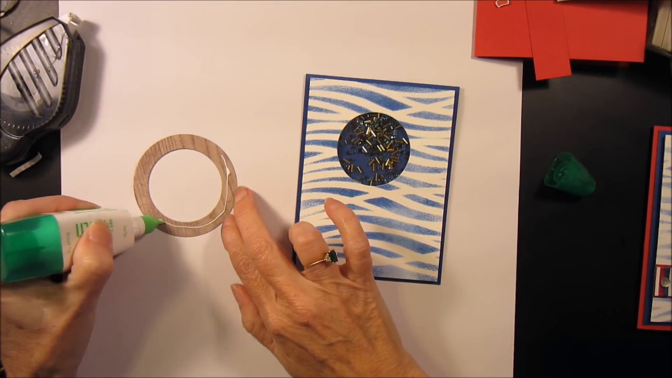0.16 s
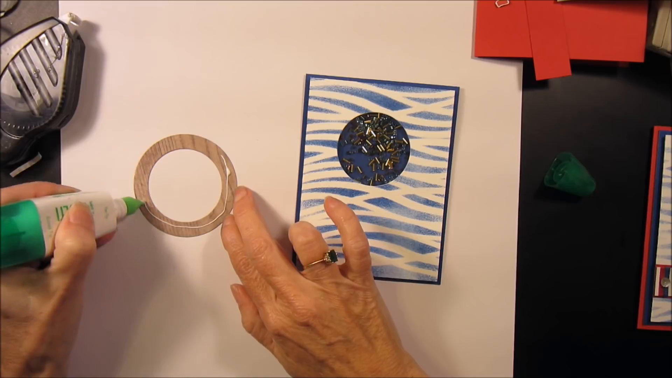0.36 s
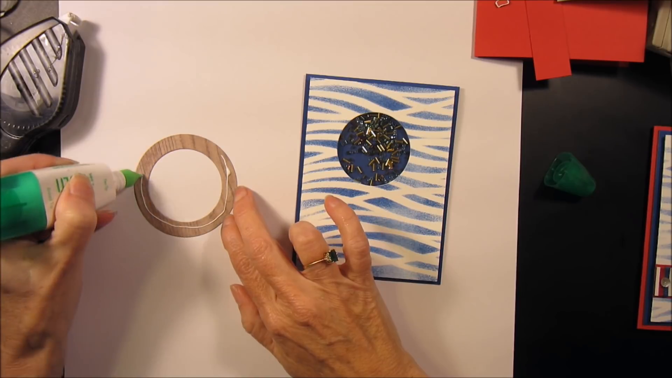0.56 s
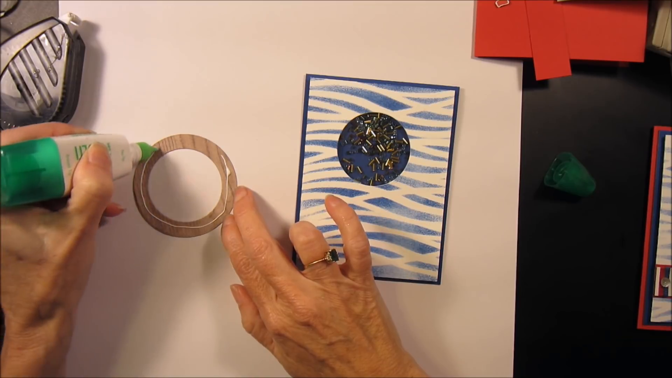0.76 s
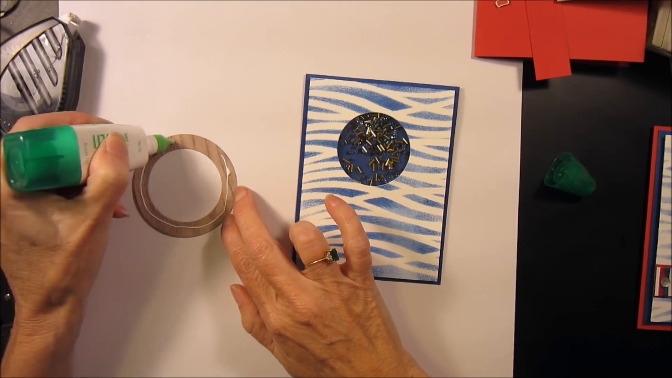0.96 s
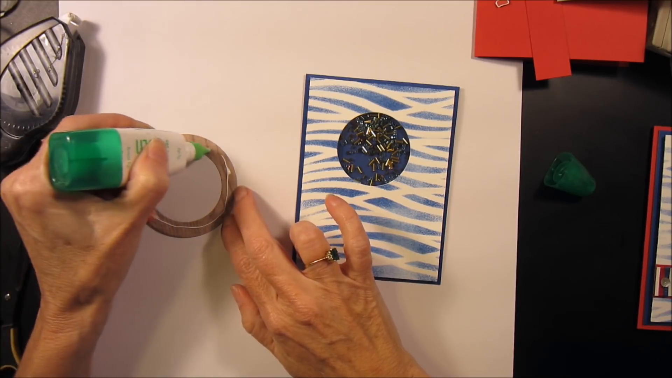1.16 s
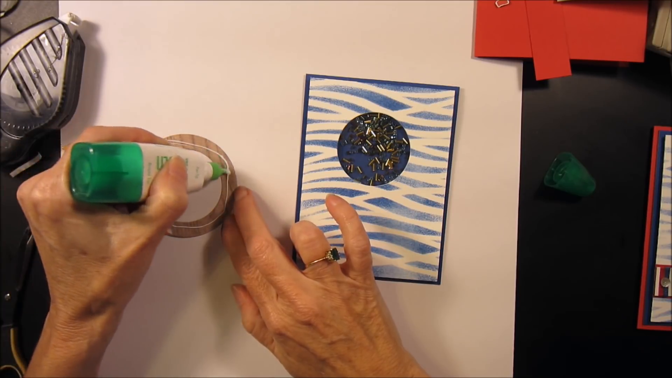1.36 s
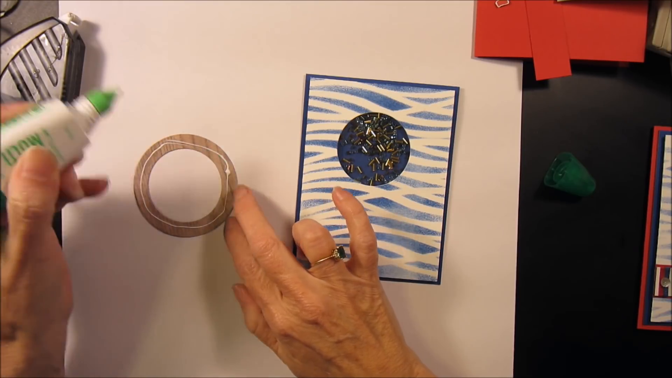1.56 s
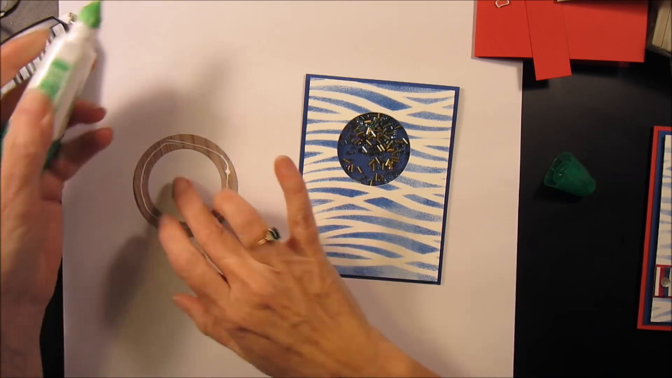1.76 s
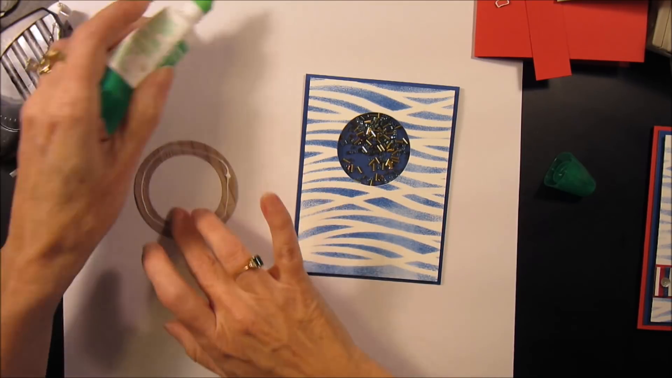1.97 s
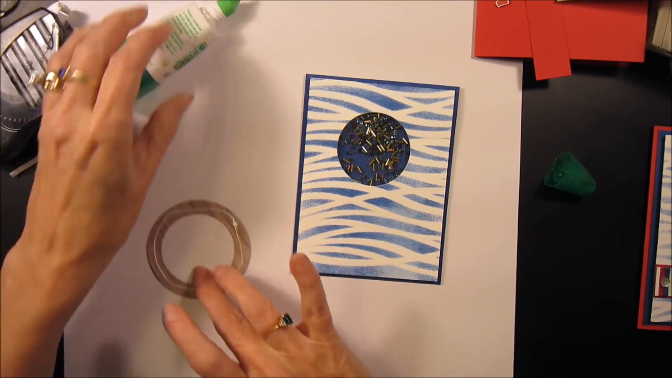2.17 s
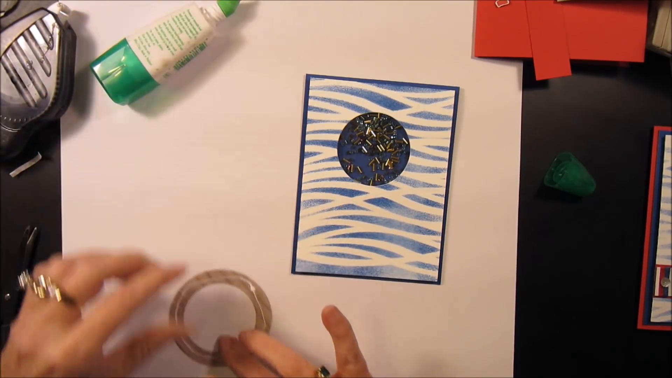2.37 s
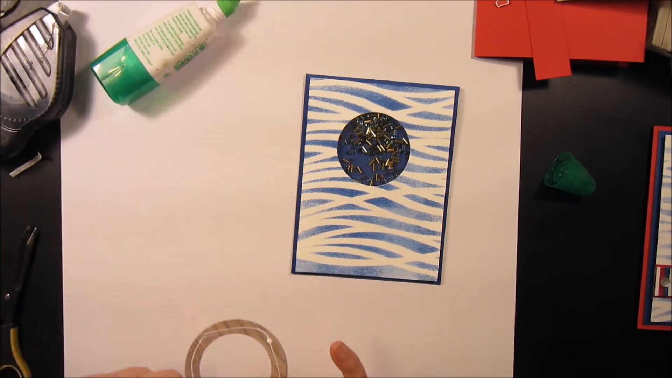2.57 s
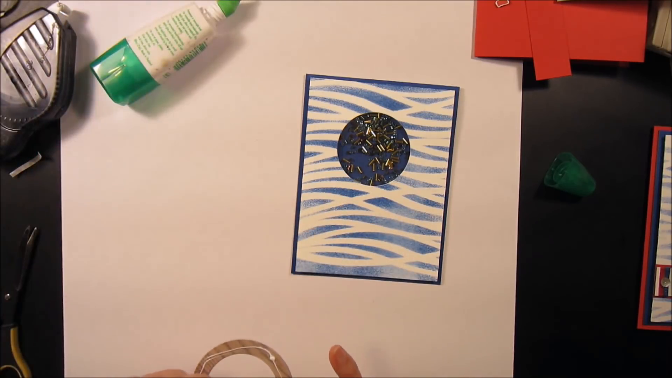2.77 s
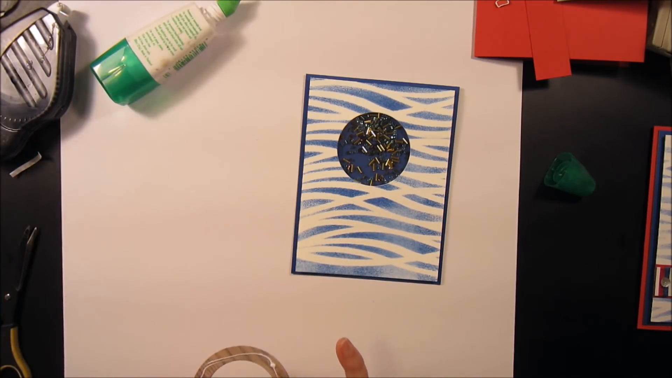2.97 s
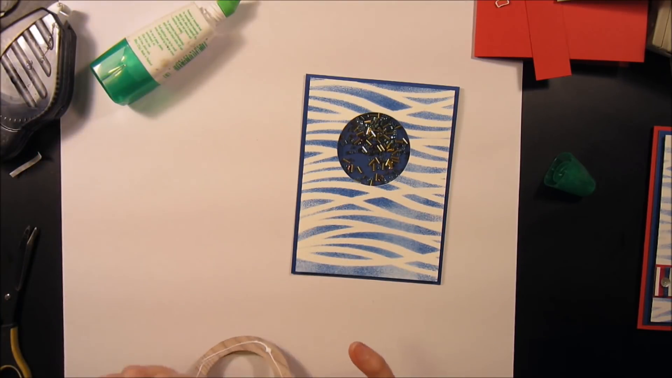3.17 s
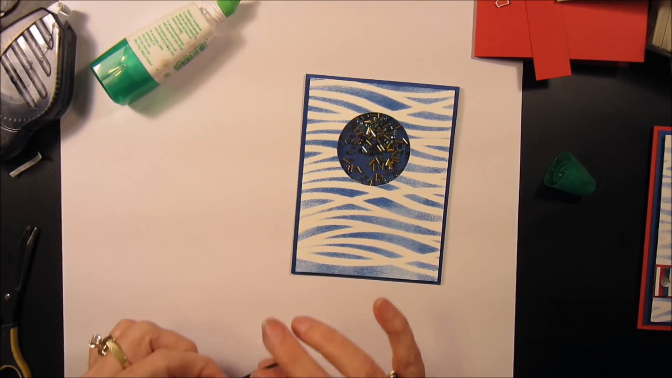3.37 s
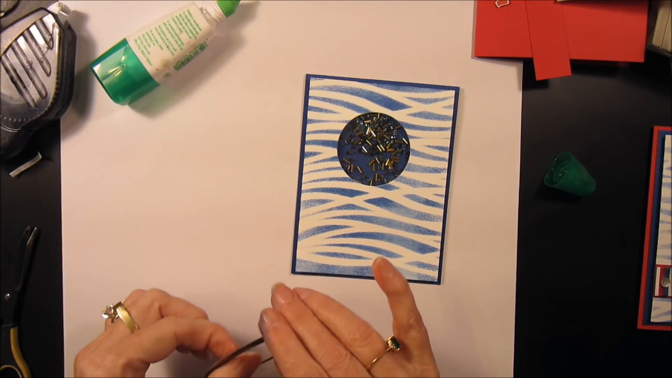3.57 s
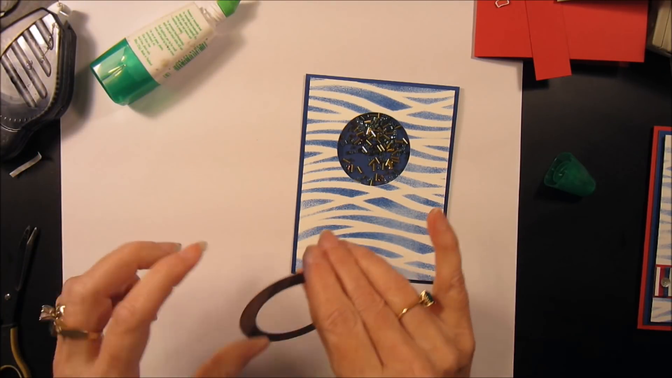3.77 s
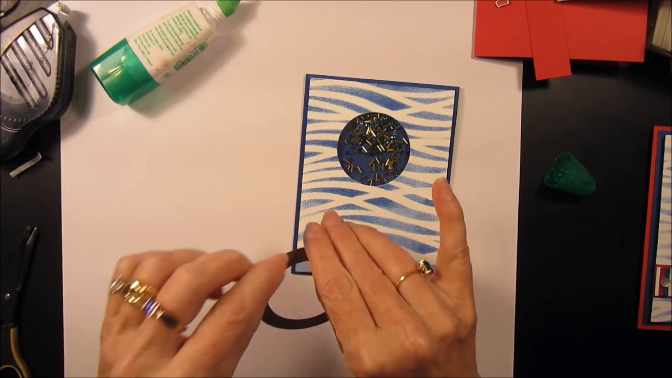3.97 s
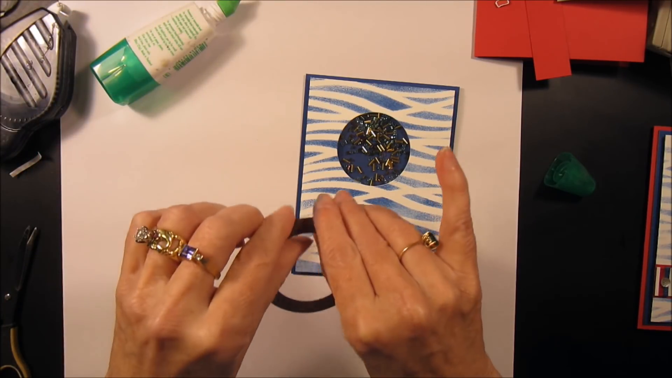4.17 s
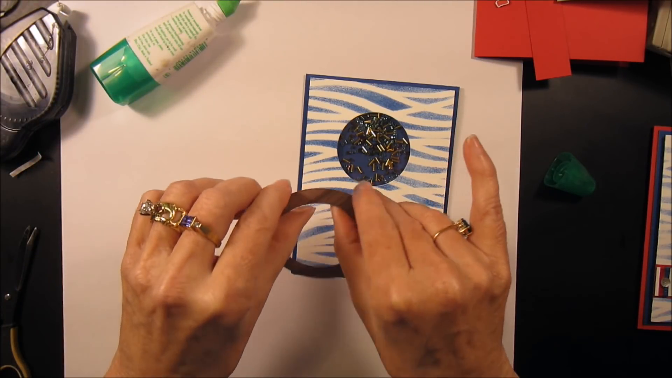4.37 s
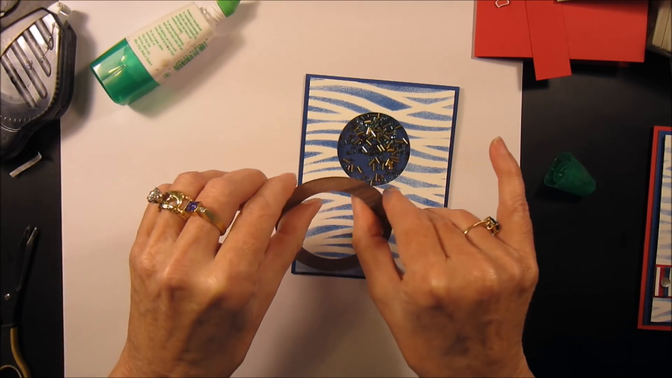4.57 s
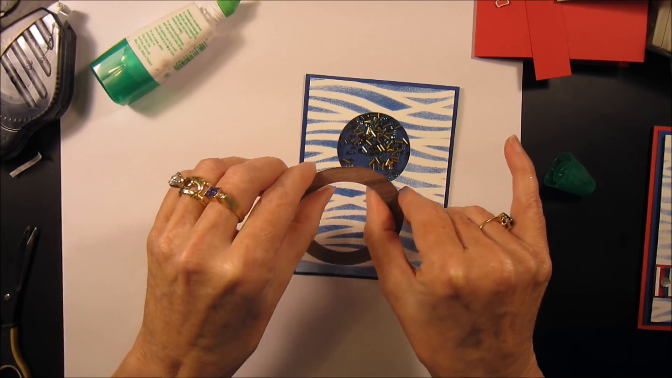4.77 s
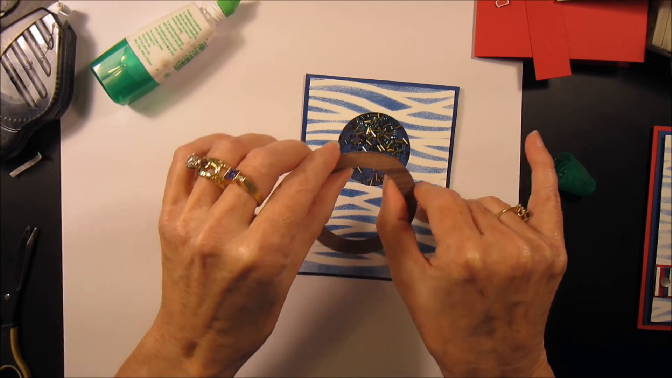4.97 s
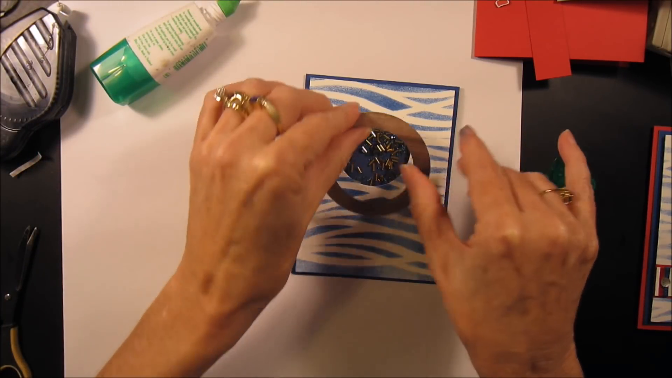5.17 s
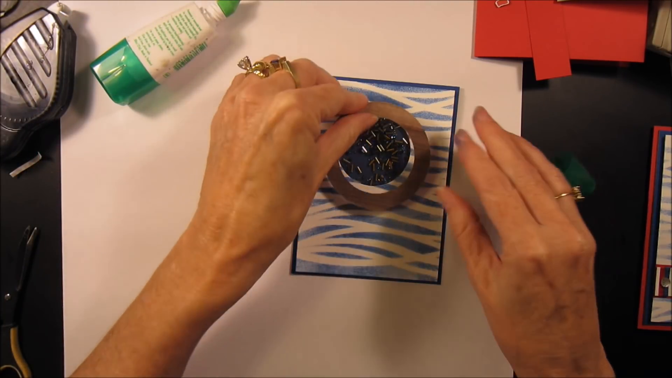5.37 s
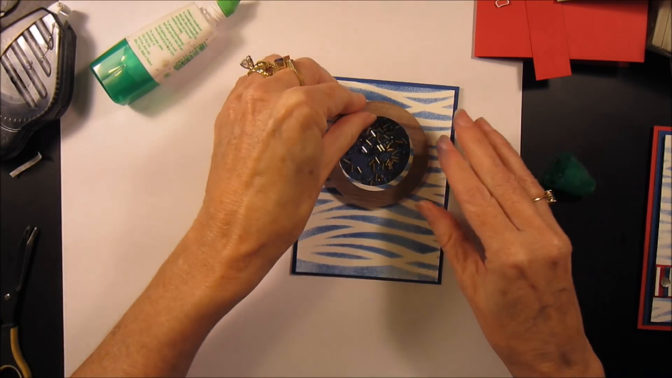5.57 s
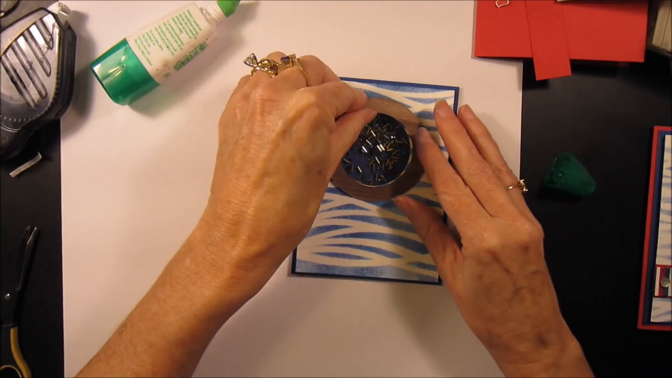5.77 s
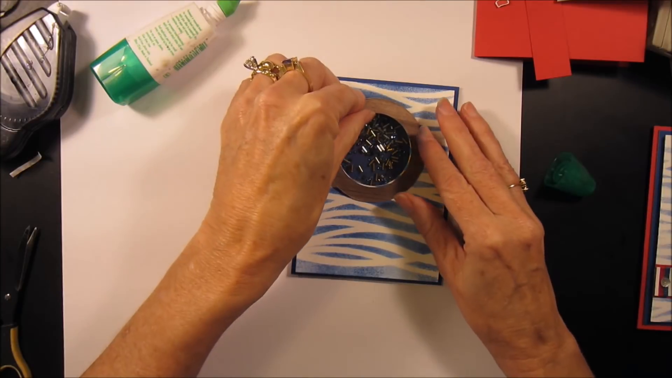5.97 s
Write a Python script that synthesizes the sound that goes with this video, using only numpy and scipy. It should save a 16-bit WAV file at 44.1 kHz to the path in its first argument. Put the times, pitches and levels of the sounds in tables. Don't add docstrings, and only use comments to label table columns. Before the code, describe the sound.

Faint glue snaps, two sharp knocks of a plastic bottle on a work table, then light paper scuffing and sparse ticks over soft hiss.

```python
import sys
import numpy as np
from scipy import signal
from scipy.fft import rfft, irfft
from scipy.io import wavfile
from scipy.ndimage import uniform_filter1d

SR = 44100
rng = np.random.default_rng(int(sys.argv[2]) if len(sys.argv) > 2 else 0)


def gain_from_db(level_db):
    decades = np.asarray(level_db, float) / 20
    return 10 ** decades


def dump_mix(stems):
    frames = np.atleast_2d(stems).T
    limited = np.clip(frames, -1, 1)
    pcm = np.round(limited * 32767).astype(np.int16)
    wavfile.write(sys.argv[1], SR, pcm)


N = 266099

# pitch_hz, level_db (per Hz)
AIR_COLOUR = [(12, -69), (20, 0), (70, 1.5), (107, 1), (150, 1.5), (328, -4), (485, -6), (542, -8),
              (1220, -11), (6360, -19), (7950, -20), (8650, -19.5), (12800, -26.5), (16000, -31.5)]
AIR_DB = -59.5
# time_s, level_db
AIR_SWELL = [(0, 2), (.15, -0.5), (1, 0), (1.5, -0.5), (3.5, -1), (4.8, 0), (6.03, -2)]
# pitch_hz, level_db (rms)
LAMP_WHINE = [(59.2, -102), (7730, -84), (7790, -81.5), (7854, -73.5), (7881, -85.5), (13308, -108)]
# pitch_hz, t60_s (time to fall by 60 dB)
ROOM_DECAY = [(100, 0.54), (400, 0.28), (800, 0.46), (1500, 0.36), (2500, 0.39), (4000, 0.25), (7000, 0.27),
              (12000, 0.14)]
ROOM_DB = -10.5

# pitch_hz, level_db (per Hz)
PAPER_HISS = [(2350, -46), (4000, -2.5), (4680, -3), (5040, -3.5), (7620, -1.5), (9380, -3), (13400, -3),
              (16000, -16)]
# pitch_hz, level_db (per Hz)
PAPER_DRAG = [(350, -6), (700, 1.5), (1300, 0), (2100, 4.5), (2700, -1), (3300, 3), (4500, -1), (6000, -3),
              (9000, -32)]
# peak_s, swell_s, fade_s, hiss_db, drag_db
PUSHES = [(.02, .1, 0.45, -66, -74), (1.673, .03, 0.04, -58, -62), (1.703, 0.027, .025, -61, -62),
          (1.765, .008, .07, -65, -68), (1.81, 0.073, .012, -78, -68), (1.985, .03, 0.18, -68, -90),
          (2.012, .004, 0.07, -53, -80), (2.11, 0.27, 0.0087, -54, -88), (2.152, .008, .06, -57, -80),
          (2.21, .04, 0.35, -57.5, -65), (2.334, 0.28, 0.4, -52, -79), (2.461, 0.069, 0.048, -52, -65),
          (2.558, 0.19, .12, -55.5, -59), (2.62, 0.065, .008, -60, -56.5),
          (2.692, 0.0094, 0.021, -57, -53.5), (2.73, .008, 0.1, -64, -63.5), (2.942, .008, 0.17, -66, -73),
          (2.977, .008, 0.04, -56.5, -78), (3.165, 0.1, .03, -62.5, -77), (3.23, .025, 0.093, -58, -66),
          (3.286, 0.087, 0.024, -65, -61), (3.361, .005, .01, -71, -80), (3.4, 0.058, .025, -64, -76),
          (3.688, .02, .018, -61, -90)]
# start_s, length_s, edge_hz, edge_db, drag_db
SCUFFS = [(1.733, 0.025, 9400, -58, -65), (2.52, .085, 1990, -60.5, -80), (2.514, .09, 3260, -59.5, -80),
          (2.52, 0.066, 7700, -56, -77), (2.616, 0.034, 10500, -60, -62),
          (2.634, 0.033, 9670, -50.5, -53.5), (2.653, 0.046, 10500, -56, -56.5),
          (2.869, 0.036, 10700, -59.5, -67), (2.893, 0.041, 10600, -51.5, -82),
          (2.926, 0.013, 9100, -50.5, -54), (3.321, 0.04, 10900, -46, -79),
          (3.323, 0.036, 5050, -46.5, -85), (3.331, 0.027, 2860, -51, -73),
          (5.112, 0.017, 9200, -47.5, -59), (5.119, 0.015, 5000, -54.5, -64),
          (5.122, 0.013, 2060, -54.5, -54), (5.125, 0.0097, 1030, -55, -72),
          (5.113, 0.018, 12800, -56, -60), (5.5878, 0.0076, 3470, -49.5, -75),
          (5.591, 0.0047, 6540, -51, -70), (5.592, 0.0037, 10200, -57, -67)]
# start_s, peak_db, pitch_hz
GLUE_TICKS = [(1.5738, -46, 10500), (1.5797, -32, 10700), (1.5925, -27, 9900), (1.606, -29, 10700),
              (1.6113, -28, 11100), (1.62, -46, 13100), (1.6402, -28, 10900), (1.6412, -27.5, 10900),
              (1.667, -42, 14500), (1.677, -29, 9500), (2.1236, -16.5, 7100), (2.6377, -26, 5000),
              (2.6455, -36, 11200), (2.655, -48, 4000), (2.67, -41, 4500), (2.677, -37, 3500),
              (2.688, -37, 4000), (2.7297, -37, 12000), (2.897, -32, 11500), (2.952, -33, 6000),
              (2.9617, -40, 14000), (2.9759, -31, 10100), (3.3946, -44, 3000), (5.5672, -46, 13000)]
# start_s, peak_db, pitch_hz, t60_s
NAIL_TAPS = [(1.623, -41, 3130, .0023), (1.6757, -43, 3500, 0.0016), (2.461, -36.5, 3460, 0.0027),
             (2.928, -43, 4100, 0.012), (4.1769, -46, 1230, 0.011), (4.176, -42.5, 2570, .004),
             (5.5874, -32.5, 3230, 0.0045), (5.5885, -39, 6460, .0024)]

# pitch_hz, peak_db, t60_s
SHELL = [(262, -29.5, 0.023), (650, -21.5, 0.016), (1000, -37, 0.14), (1180, -12, 0.0093),
         (1230, -40, 0.035), (1400, -26, 0.027), (1530, -23, 0.0073), (1760, -43, 0.037),
         (2170, -18, 0.0082), (4100, -27, 0.017), (4540, -29, 0.014), (5430, -23, 0.011),
         (7170, -34, 0.013), (8800, -32, 0.005)]
# pitch_hz, peak_db, t60_s
CAP = [(626, -19.5, 0.01), (970, -46, 0.048), (1270, -17, 0.011), (1630, -8, 0.0067), (2290, -21, 0.007),
       (2396, -12.5, 0.0087), (2800, -16, 0.0046), (3440, -24, 0.0044), (3970, -15, 0.0096),
       (4180, -12.5, 0.0073), (4860, -34, 0.0051), (5200, -21, 0.0091), (5420, -20, 0.011),
       (6530, -22, 0.0067)]
# pitch_hz, peak_db, t60_s
NUDGE = [(1040, -45, 0.016), (1160, -35, 0.013), (1630, -38.5, 0.015), (2030, -39, 0.015),
         (3250, -41.5, 0.01), (4420, -43, 0.007), (5000, -36, 0.0046)]
# pitch_hz, peak_db, t60_s
TABLE = [(92.3, -47, 0.53), (141, -29.5, 0.24), (191, -27, 0.14), (256, -16.5, 0.046), (329, -25.5, 0.17),
         (380, -38, 0.048), (427, -20.5, 0.058), (468, -19.5, 0.06), (515, -24, 0.035), (565, -27.5, 0.16),
         (594, -31, 0.068), (1490, -6, 0.0045), (2820, -30, 0.018)]
# pitch_hz, peak_db, t60_s
RIM = [(385, -24.5, 0.016), (1540, -28.5, 0.009), (2230, -19, 0.0066), (2710, -27, 0.011),
       (3370, -26.5, 0.012), (3680, -31, 0.011), (5000, -23, 0.005), (9100, -49, 0.0045),
       (11500, -42, .004)]
BODIES = [SHELL, SHELL, CAP, CAP, CAP, NUDGE, TABLE, RIM, RIM]
BLOW_TIMES = [
    1.8554,
    1.8612,
    1.8769,
    1.8828,
    1.894,
    2.075,
    2.1251,
    2.139,
    2.1448,
]
# strength_db, crack_db, build_up_s (time for the contact to form)
BLOWS = [(3, -29, 0.00046), (-4.5, -53, 0.00065), (4.5, -32, 0.0011), (-17, -56, 0.00082),
         (-23, -57, 0.0012), (2.5, -50, 0.00056), (-5.5, -25, 0.00026), (6.5, -23, 0.00065),
         (-28, -48, .0005)]

# pitch_hz, level_db
MICROPHONE = [(20, 0), (15600, 0), (16000, -25), (22000, -60)]
# time_s, lowest_hz, share_lost (0-1)
DROPOUTS = [(.083, 4000, .3), (.632, 3000, .5), (1.272, 3000, .5), (1.957, 3000, .5), (2.343, 200, .55),
            (3.087, 800, .6), (3.598, 2000, .45), (3.75, 2000, .45), (3.811, 2000, .45), (3.877, 2000, .45),
            (3.944, 900, .55), (4.047, 3000, .55), (4.308, 800, .7), (4.318, 800, .6), (5.027, 2500, .5),
            (5.37, 2000, .55), (5.69, 1500, .5), (5.836, 1500, .5), (5.927, 3000, .5)]


def evened(x):
    return x / np.sqrt(np.mean(x ** 2) + 1e-20)


def read(points, hz):
    f, value = np.transpose(points)
    return np.interp(np.log(hz + 1), np.log(f + 1), value)


def add(mix, s, sound):
    part = mix[round(s * SR):][:len(sound)]
    part += sound[:len(part)]


def coloured(x, points):
    gain = gain_from_db(read(points, np.fft.rfftfreq(len(x), 1 / SR)))
    return evened(irfft(rfft(x) * gain, len(x)))


def air():
    t = np.arange(N) / SR
    swell_db = np.interp(t, *np.transpose(AIR_SWELL))
    out = coloured(rng.standard_normal(N), AIR_COLOUR) * gain_from_db(AIR_DB + swell_db)
    for hz, db in LAMP_WHINE:
        waver = evened(uniform_filter1d(rng.standard_normal(N), size=4000))
        tone = np.sin(2 * np.pi * hz * t + 0.8 * waver)
        out += np.sqrt(2) * gain_from_db(db + 0.6 * waver) * tone
    return out


def room(x):
    hz, t, z = signal.stft(rng.standard_normal(SR // 2), SR, nperseg=256)
    walls = gain_from_db(-60 * t / read(ROOM_DECAY, hz)[:, None])
    desk = gain_from_db(-4.5 - 60 * t / 0.059)
    tail = signal.istft(z * (walls + desk), SR, nperseg=256)[1]
    tail *= np.clip(np.arange(len(tail)) / SR / 0.0015 - 0.3, 0, 1)
    return signal.fftconvolve(x, tail / np.linalg.norm(tail))[:N]


def resonate(x, hz, width):
    turn = np.exp(2j * np.pi * np.cumsum(hz) / SR)
    r = np.exp(-np.pi * width / SR)
    return 2 * (turn * signal.lfilter([1 - r], [1, -r], x / turn)).real


def patchy(x, depth_db):
    z = signal.stft(x, nperseg=256)[2]
    patches = uniform_filter1d(rng.standard_normal(z.shape), size=8, axis=0)
    patches = evened(uniform_filter1d(patches, size=14, axis=1))
    return evened(signal.istft(z * gain_from_db(depth_db * patches), nperseg=256)[1][:N])


def stroke():
    t, power = np.arange(N) / SR, np.zeros((2, N))
    for s, swell, fade, hiss_db, drag_db in PUSHES:
        away = np.where(t < s, (s - t) / max(swell, 1e-3), (t - s) / max(fade, 1e-3))
        near = away < 2
        power[:, near] += gain_from_db(np.array([[hiss_db], [drag_db]]) - 20 * away[near]) ** 2
    return np.sqrt(power)


def slides():
    bright_hz, bright_width_hz, patch_db = 10350, 2400, 1.96
    hiss = patchy(coloured(grit(N, 5.4), PAPER_HISS), patch_db)
    drag = patchy(coloured(grit(N, 5.4), PAPER_DRAG), patch_db)
    hiss_gain, drag_gain = stroke()
    bright = evened(resonate(hiss, np.full(N, bright_hz), bright_width_hz))
    hiss = evened(hiss + 0.49 * bright)
    return hiss_gain * hiss + drag_gain * drag


def grit(count, spread_db):
    catch = uniform_filter1d(rng.exponential(1, count), size=12)
    return evened(rng.standard_normal(count) * gain_from_db(spread_db * (catch - 1)))


def scuffs():
    out = np.zeros(N)
    sag = 0.036
    for s, length, edge_hz, edge_db, drag_db in SCUFFS:
        fibres = grit(4096, 6.0)
        count = int(length * SR)
        hz = edge_hz * np.linspace(1 + sag / 2, 1 - sag / 2, count)
        width = 0.44 * edge_hz
        edge = resonate(resonate(fibres[:count], hz, width), hz, width)
        drag = coloured(fibres, PAPER_DRAG)[:count]
        rub = gain_from_db(edge_db) * evened(edge) + gain_from_db(drag_db) * drag
        add(out, s, rub * signal.windows.tukey(count, 0.7))
    return out


def ticks():
    out, t = np.zeros(N), np.arange(600) / SR
    glue_t60_s, echo_s = 0.00079, 0.00037
    for s, db, hz, t60 in [(*row, glue_t60_s) for row in GLUE_TICKS] + NAIL_TAPS:
        onset = np.minimum(t * hz + 0.71, 1)
        snap = gain_from_db(db - 60 * t / max(t60, 1e-4)) * np.sin(2 * np.pi * hz * t) * onset
        add(out, s, snap)
        add(out, s + echo_s, 0.067 * snap)
    return signal.sosfilt(signal.butter(2, 900, "high", fs=SR, output="sos"), out)


def ring(modes, rise, lead):
    t = np.arange(SR // 4) / SR
    out = np.zeros(len(t))
    for hz, db, t60 in modes:
        out += gain_from_db(db - 60 * t / t60) * np.sin(2 * np.pi * hz * t + lead)
    return out * (1 - np.exp(-t / max(rise, 2e-5)))


def bottle():
    out, t = np.zeros(N), np.arange(3000) / SR
    lead = 1
    crisp = signal.butter(2, [3000, 12000], "band", fs=SR, output="sos")
    dense = signal.butter(2, [900, 6500], "band", fs=SR, output="sos")
    for s, body, (db, crack_db, rise) in zip(BLOW_TIMES, BODIES, BLOWS):
        noise = rng.standard_normal((2, len(t)))
        crack = signal.sosfilt(crisp, noise[0] * np.exp(-t / (0.00076 + rise)))
        clatter = signal.sosfilt(dense, noise[1] * gain_from_db(-60 * t / 0.025))
        add(out, s, gain_from_db(db) * ring(body, rise, lead))
        add(out, s, gain_from_db(crack_db) * (crack + gain_from_db(-3.0) * clatter))
    small = signal.butter(2, 75, "high", fs=SR, output="sos")
    return signal.sosfilt(small, out)


def scene():
    near = bottle() + ticks() + slides() + scuffs()
    return (near + gain_from_db(ROOM_DB) * room(near) + air())[None]


def drop_faint(x):
    size = 1536
    out, hz = x.copy(), np.fft.rfftfreq(size, 1 / SR)[:-1]
    for s, low_hz, share in DROPOUTS:
        start = round(s * SR) - size // 2
        z = rfft(x[start:start + size] * np.hanning(size))
        power = abs(z[:-1] / gain_from_db(0.8 * read(AIR_COLOUR, hz))) ** 2
        band = np.repeat(power.reshape(48, 16).mean(1), 16)
        limit = np.quantile(band[(hz > low_hz) & (hz < 16000)], share)
        lost = (band < limit) & (hz > low_hz)
        out[start:start + size] -= irfft(z * np.append(0.93 * lost, 0))
    return out


def roll_off(x):
    return signal.sosfilt(signal.butter(12, 16510, fs=SR, output="sos"), x)


def record(dry):
    gain = gain_from_db(read(MICROPHONE, np.fft.rfftfreq(N, 1 / SR)))
    heard = irfft(rfft(dry[0]) * gain, N)
    mix = drop_faint(heard)[None]
    return roll_off(mix)


dry = scene()
out = record(dry)
dump_mix(out)
```